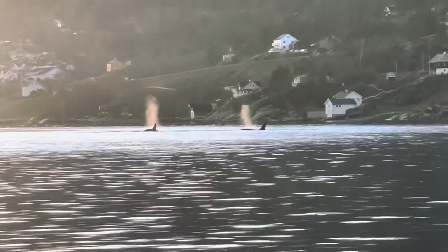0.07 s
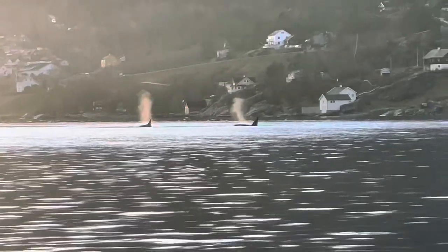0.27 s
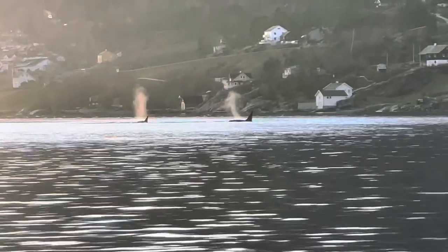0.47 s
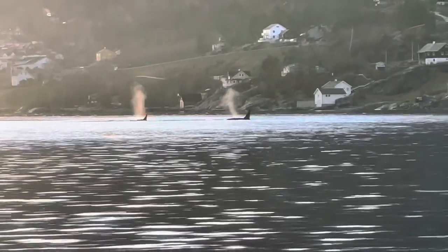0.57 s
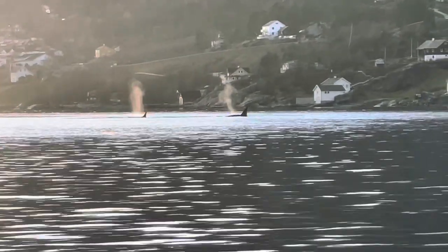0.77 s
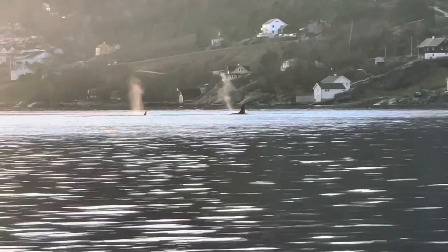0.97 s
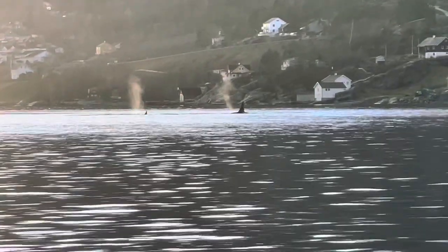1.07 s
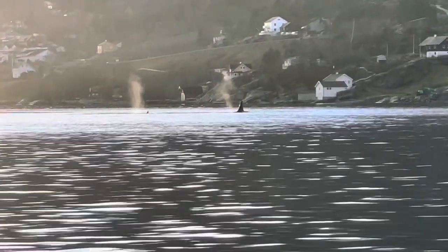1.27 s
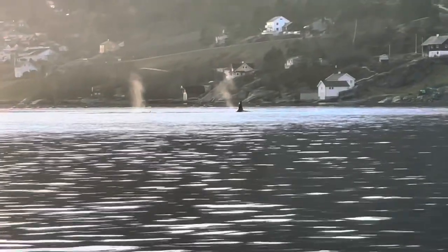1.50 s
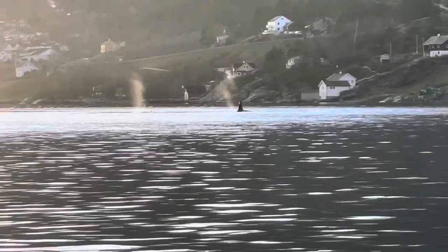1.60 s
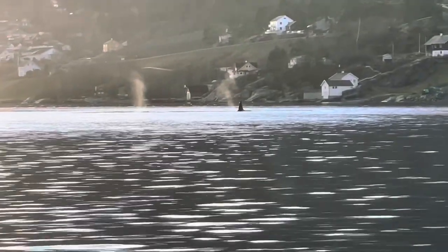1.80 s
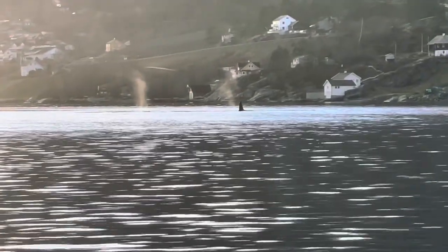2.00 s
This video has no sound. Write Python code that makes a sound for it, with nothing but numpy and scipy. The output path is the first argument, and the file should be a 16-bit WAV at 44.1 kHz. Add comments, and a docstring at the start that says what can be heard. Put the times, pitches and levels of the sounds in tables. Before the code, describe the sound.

Wind rumbles and thumps on the microphone for the whole two seconds, with the strongest thump at about 1.2 seconds. Beneath it lies a dull wash of water with a few small laps. Distant whales blow soft hollow puffs at about 0.3, 0.7 and 0.8 seconds. A faint high swish passes close from 0.1 to 0.8 seconds, and tiny high ticks come now and then.

```python
"""Wind on the microphone, on a boat in a fjord: eddies thump the two ports over a gusting rumble.
All around lies the dull wash of water, with a few small waves lapping. Far off, whales push air
through their blowholes, heard as soft hollow puffs. Close to the microphone a faint high swish
passes, perhaps the cloth of a jacket. Faint high ticks and pings come now and then."""
import sys
import numpy as np
from scipy import signal
from scipy.fft import rfft, irfft
from scipy.io import wavfile

SR = 44100
rng = np.random.default_rng(int(sys.argv[2]) if len(sys.argv) > 2 else 0)


def inscribe(sig):
    """Save sig as 16-bit PCM at rate SR to the path in sys.argv[1].

    A 1-D sig is mono; a 2-D sig holds one channel per row.
    Samples are clipped to [-1, 1] before scaling.
    """
    pcm = np.round(np.clip(np.atleast_2d(sig).T, -1, 1) * 32767)
    wavfile.write(sys.argv[1], SR, pcm.astype(np.int16))


N = 90404
T = np.arange(N) / SR
HZ = np.fft.rfftfreq(N, 1 / SR)

# Stereo width of the microphone pair, whose ports cancel near 8.7 kHz.
# Each row: frequency in Hz, side minus mid in dB.
PAIR_WIDTH = [(100, -5), (250, -5.5), (400, -7.5), (800, -1), (1250, -1), (1600, -7.5), (2150, -28.5),
              (2600, -28), (3200, -11), (4200, -27), (5800, -4), (7400, -3.5), (8700, 19.5), (10000, 1.5),
              (11700, -1), (13500, -19.5)]
# Water and far air around the boat. Each row: frequency in Hz, relative level in dB.
WASH_SPECTRUM = [(40, -7), (230, 2), (350, -0.5), (520, -4.5), (800, -5), (1100, -9), (1500, -14),
                 (2100, -17.5), (2800, -24), (3500, -31), (4000, -40), (4600, -51.5), (7000, -52),
                 (9000, -53.5), (12500, -55), (15000, -74)]
# Balance of the wash. Each row: frequency in Hz, left minus right in dB.
WASH_BALANCE = [(300, -0.3), (700, -2.5), (1200, 3), (1800, 0)]
# Small waves lapping. Each row: peak time in seconds, level in dB, half-length in seconds,
# centre in Hz, spread in octaves.
WATER_LAPS = [(0.166, -60.5, 0.037, 830, 0.45), (0.398, -60, 0.016, 950, 0.77),
              (1.92, -60, 0.018, 950, 0.25)]
# Far whale blows as they reach the boat. Each row: start in seconds, level in dB, seconds until
# the fade, lowest resonance in Hz, gain of the upper resonances in dB.
WHALE_BLOWS = [(0.314, -45, 0.066, 231, -13.5), (0.68, -44, 0.063, 351.2, 0),
               (0.811, -49.5, 0.048, 337.5, -3)]
# Resonances of a blowhole. Each row: multiple of the lowest, bandwidth in Hz, relative level in dB.
BLOWHOLE_MODES = [(1, 34, 0), (1.29, 48, -5), (1.85, 160, -13)]
# The swish passing close by. Each row: time in seconds, level in dB.
SWISH_ENVELOPE = [(0, -106), (.085, -100), (.15, -78), (.19, -81.5), (.27, -72.5), (.4, -69.5),
                  (.46, -72.5), (.53, -75), (.67, -78), (.8, -87), (.92, -96.5), (1.02, -108), (2.05, -118)]
# Colour of the swish. Each row: frequency in Hz, relative level in dB.
SWISH_SPECTRUM = [(1000, -10), (2800, 9), (4200, 8), (5500, 2), (7500, 1.5), (9000, 0.5), (12000, 1.5),
                  (14200, 3.5), (15500, -9)]
# Faint high ticks and pings; a thin 12 kHz ping sounds with the loudest wind thump.
# Each row: peak time in seconds, level in dB, half-length in seconds, centre in Hz, spread in octaves.
HIGH_TICKS = [(0.392, -62, 0.0018, 8000, 1.), (0.654, -79, .008, 7000, .7), (0.887, -85, 0.015, 13000, .15),
              (1.035, -95, 0.013, 13000, .12), (1.184, -86, .008, 12200, .02),
              (1.273, -84, .0015, 12100, 0.072), (1.284, -90, .006, 12300, .1),
              (1.51, -89, 0.014, 4700, .35), (1.82, -88.5, 0.013, 10000, .5)]
# Wind rumble at the microphone. Each row: frequency in Hz, relative level in dB.
RUMBLE_SPECTRUM = [(15, -30), (24, -15.5), (45, 5), (70, 3), (110, -1), (160, -14), (240, -10), (400, -32),
                   (900, -57.5), (2500, -97.5)]
# Gusts in the rumble. Each row: time in seconds, gain in dB.
GUSTS = [(0, -4), (.115, -3), (.135, -13), (.17, -13), (.21, -4.5), (.33, -8.5), (.44, 0.5), (.52, -6.5),
         (.6, -1.5), (.66, 2.5), (.73, -2), (.86, 0.5), (.98, -6.5), (1.15, 0.5), (1.26, -5.5), (1.35, 0),
         (1.42, -11.5), (1.52, 3.5), (1.65, -7), (1.79, 0), (1.9, -2.5), (2.05, -6.5)]
# Eddies striking the microphone. Each row: time in seconds, peak level in dB,
# half-width of the pressure pulse in seconds.
WIND_EDDIES = [(0.011, -36, 0.0063), (0.067, -41.5, 0.002), (0.092, -38.5, 0.0026), (0.184, -35, 0.0039),
               (.207, -32.5, 0.0027), (.281, -33, 0.0019), (0.412, -29.5, 0.0042), (0.461, -24.5, 0.00294),
               (0.544, -28.5, 0.0011), (0.625, -25.5, 0.004), (0.647, -29, 0.0017), (0.759, -34.5, 0.0021),
               (0.828, -33.5, 0.0009), (0.901, -30, 0.0059), (0.922, -25.5, 0.0018), (1.009, -33, 0.0016),
               (1.112, -38.5, 0.0028), (1.147, -34.5, 0.0022), (1.18, -15.5, 0.002), (1.328, -33, 0.0022),
               (1.453, -34, 0.005), (1.484, -25.5, 0.004), (1.513, -28.5, 0.00096), (1.538, -29, 0.0016),
               (1.576, -31, 0.001), (1.695, -36.5, 0.0024), (1.773, -34.5, 0.0018), (1.803, -35, 0.0014),
               (1.841, -39, 0.0015), (2.009, -35, 0.0022)]


def amp(db):
    """Decibels to gain."""
    return 10 ** (np.asarray(db) / 20)


def unit_rms(x):
    """Scales to rms 1."""
    return x / np.sqrt(np.mean(x ** 2) + 1e-30)


def curve_db(points):
    """A table's decibels at every frequency, joined on a log-frequency axis."""
    hz, db = np.transpose(points)
    return np.interp(np.log(HZ + 1), np.log(hz + 1), db)


def noise(gain, width_db):
    """Stereo noise of rms 1 with a given spectrum and width."""
    mid, side = rfft(rng.standard_normal((2, N)))
    width = amp(width_db)
    left_right = np.array([mid + width * side, mid - width * side]) / np.hypot(1, width)
    return unit_rms(irfft(left_right * gain, N))


def drift(seconds):
    """Slow random curve of rms 1."""
    smoothing = np.exp(-(HZ * seconds) ** 2) * (HZ > 1)
    return unit_rms(irfft(rfft(rng.standard_normal(N)) * smoothing, N))


def burst(time, level_db, length, centre_hz, octaves):
    """A short swell of noise in one band: a lap of water, or a high tick or ping."""
    band = np.exp(-.5 * (np.log2((HZ + 1) / centre_hz) / octaves) ** 2)
    swell = np.exp(-((T - time) / length) ** 2)
    return amp(level_db) * swell * noise(band, curve_db(PAIR_WIDTH))


def water_wash(level_db=-49, waver_db=0.74, fade_db_per_s=0.5):
    """Ripples all around the boat: dull noise whose octaves waver each on their own."""
    spectrum_db = curve_db(WASH_SPECTRUM) + np.outer([.5, -.5], curve_db(WASH_BALANCE))
    water = rfft(noise(amp(spectrum_db), curve_db(PAIR_WIDTH)))
    octave = np.clip(np.log2((HZ + 1) / 250), 0, 5)
    ripples = 0
    for k in range(6):
        band = irfft(water * np.maximum(1 - abs(octave - k), 0), N)
        ripples += band * amp(waver_db * drift(0.019))
    return amp(level_db - fade_db_per_s * T) * unit_rms(ripples)


def whale_blow(start, level_db, length, low_hz, upper_db, rise_s=0.037, t60_s=0.21, hoot_share=0.23):
    """Far off, air bursts through a blowhole: each resonance is part wavering hoot, part rush of air."""
    hollow = 0
    for k, (multiple, bandwidth, db) in enumerate(BLOWHOLE_MODES):
        hz = multiple * low_hz
        wavering_hz = hz * (1 + 0.032 * drift(.015))
        hoot = unit_rms(np.sin(2 * np.pi * np.cumsum(wavering_hz) / SR))
        rush = noise(1 / (1 + (2 * (HZ - hz) / bandwidth) ** 2), width_db=-6.5)
        resonance = np.sqrt(hoot_share) * hoot + np.sqrt(1 - hoot_share) * rush
        hollow += amp(db + upper_db * (k > 0)) * resonance
    rise = np.clip((T - start) / rise_s, 0, 1)
    fade = np.exp(-np.log(1000) * np.maximum(T - start - length, 0) / t60_s)
    return amp(level_db) * rise * fade * unit_rms(hollow)


def swish(grain_db=1.0):
    """A grainy hiss close to the microphone, perhaps sliding cloth."""
    slide = amp(np.interp(T, *np.transpose(SWISH_ENVELOPE)) + grain_db * drift(0.0085))
    return slide * noise(amp(curve_db(SWISH_SPECTRUM)), curve_db(PAIR_WIDTH))


def wind_rumble(base_db=-39.5, waver_db=0.5):
    """Small turbulence right at the microphone, swelling and sinking quickly."""
    level_db = base_db + np.interp(T, *np.transpose(GUSTS)) + waver_db * drift(0.065)
    return amp(level_db) * noise(amp(curve_db(RUMBLE_SPECTRUM)), width_db=-2)


def wind_eddies(low_cut_hz=55.5, port_lag_s=.0006, port_spread_db=2.5):
    """Each eddy is a push of pressure that rings the microphone's steep low cut: a short falling thump."""
    low_cut = signal.butter(N=7, Wn=low_cut_hz, btype="high", fs=SR, output="sos")
    out = np.zeros((2, N))
    side = np.array([[.5], [-.5]])
    for time, db, half_width in WIND_EDDIES:
        lag, tilt = rng.standard_normal(2)  # it reaches the two ports a little apart, and unequally
        arrival = time + side * port_lag_s * np.sign(lag)
        near = abs(T - time) < .2
        offset = (T[near] - arrival) / half_width
        push = np.exp(-.5 * np.minimum(offset ** 2, 100))
        thump = signal.sosfilt(low_cut, push)
        out[:, near] += amp(db + side * port_spread_db * tilt) * thump / abs(thump).max()
    return out


def scene():
    """From the boat: water all around, whales far off, a swish and ticks, wind on the microphone."""
    water = water_wash() + sum(burst(*lap) for lap in WATER_LAPS)
    wind = wind_eddies() + wind_rumble()
    whales = sum(whale_blow(*blow) for blow in WHALE_BLOWS)
    treble = swish() + sum(burst(*tick) for tick in HIGH_TICKS)
    return water + whales + treble + wind


def record(dry, edge_hz=15700):
    """The recorder's band limit cuts off the highest treble."""
    low_pass = signal.firwin(511, edge_hz, window=("kaiser", 9), fs=SR)
    padded = np.pad(dry, ((0, 0), (255, 255)), "reflect", reflect_type="odd")
    return signal.oaconvolve(padded, low_pass[None], "valid")


dry = scene()
out = record(dry)
inscribe(out)
```